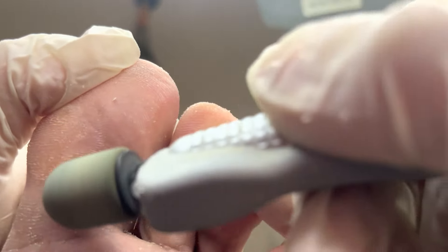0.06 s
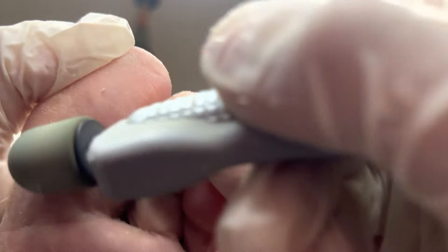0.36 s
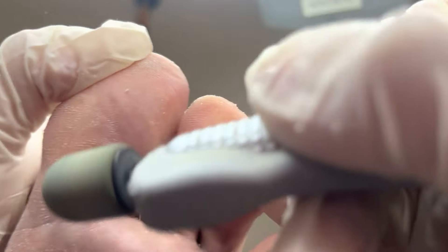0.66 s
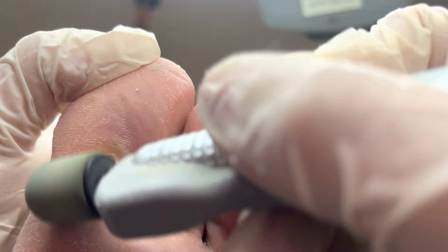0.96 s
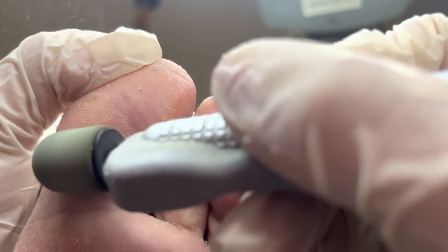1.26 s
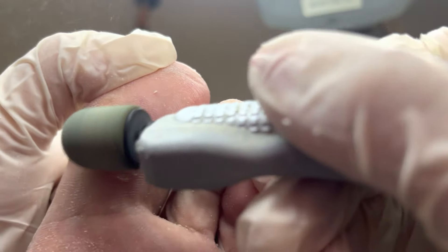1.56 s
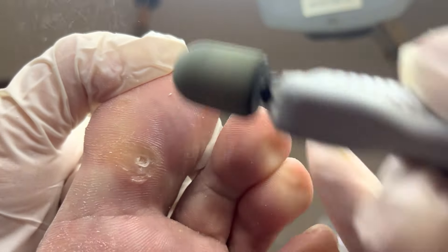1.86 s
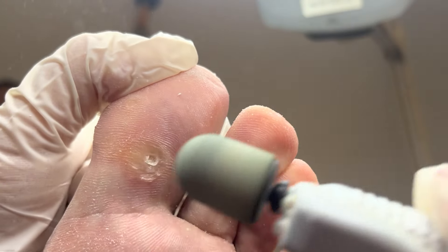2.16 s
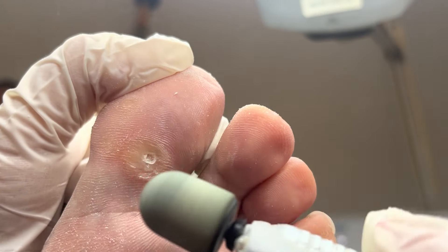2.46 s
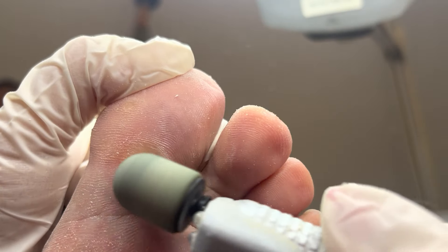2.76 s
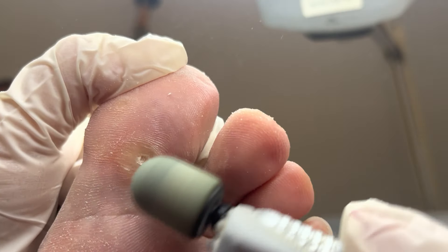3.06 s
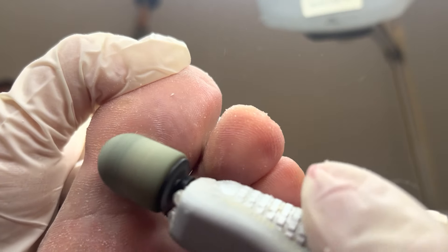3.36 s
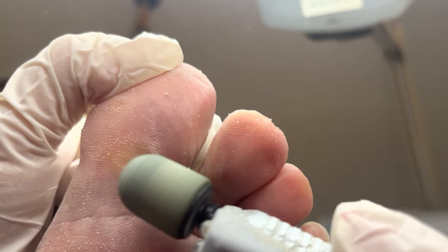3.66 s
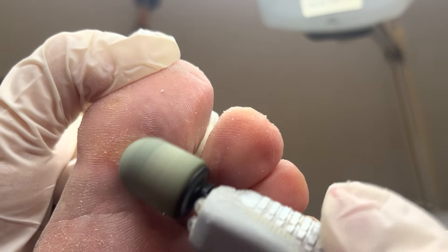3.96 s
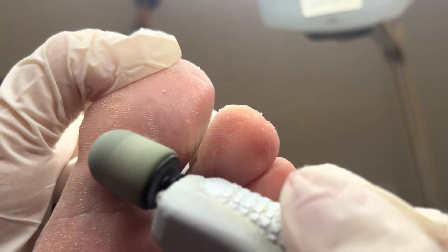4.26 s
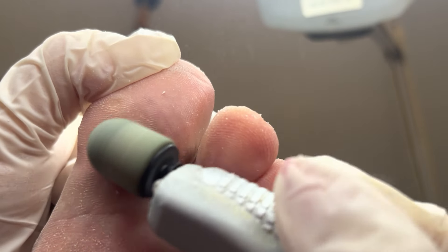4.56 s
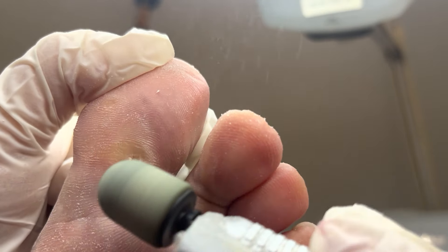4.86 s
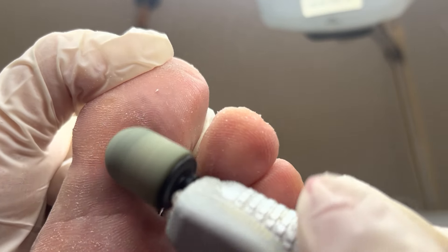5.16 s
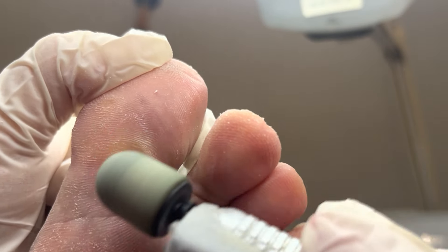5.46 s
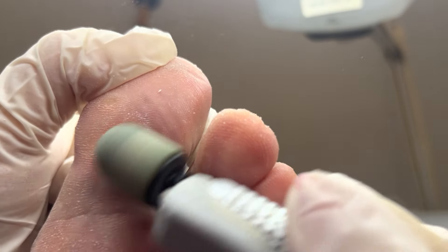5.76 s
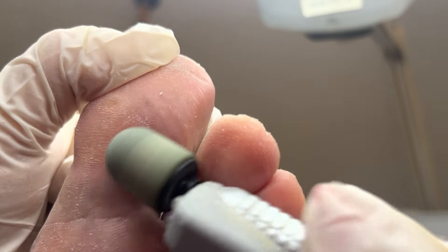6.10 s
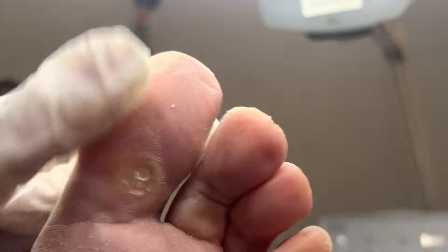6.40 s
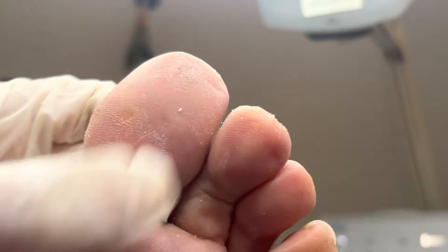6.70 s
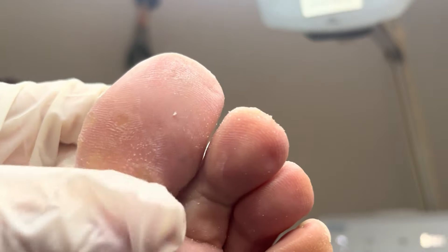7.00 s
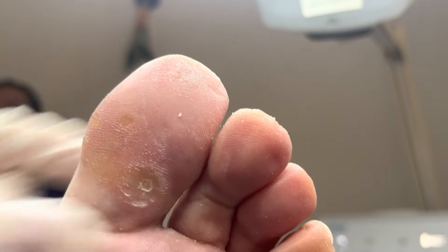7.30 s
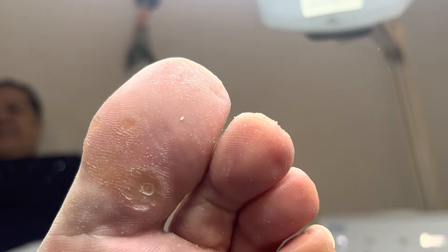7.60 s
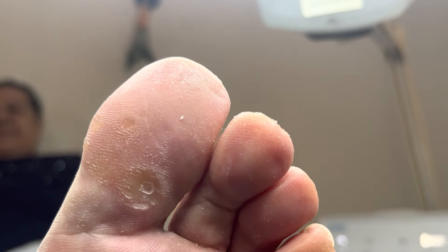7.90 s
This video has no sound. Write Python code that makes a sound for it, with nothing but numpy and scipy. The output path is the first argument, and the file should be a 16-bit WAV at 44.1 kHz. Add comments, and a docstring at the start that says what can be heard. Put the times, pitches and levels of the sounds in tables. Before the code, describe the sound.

In a quiet treatment room, a small electric rotary drill sands a callus close to the microphone. Short, uneven strokes hiss and crackle with a fast rattling buzz and tiny sharp ticks. The sanding pauses briefly while the drill keeps spinning, then resumes for a longer run. The tool is drawn away with a click and whirs on over faint ventilation hum. A soft bump on the microphone comes at the end.

```python
"""Sanding a callus with a rotary drill

In a quiet treatment room a sanding cap is stroked over the skin. Friction makes the grit hiss and
crackle; under pressure the uneven cap knocks several times a turn. The drill is drawn away, bearings
still whirring, over the hum of ventilation. At the end a hand bumps the recorder and its case rings."""
import sys
import numpy as np
from scipy import signal
from scipy.fft import rfft, irfft, next_fast_len
from scipy.io import wavfile
from scipy.ndimage import uniform_filter1d

SR = 44100
rng = np.random.default_rng(int(sys.argv[2]) if len(sys.argv) > 2 else 0)


def unload_wav(signal):
    """Save mono or channel-first audio to the path in sys.argv[1] as 16-bit WAV at rate SR, clipped to [-1, 1]."""
    wavfile.write(
        sys.argv[1],
        SR,
        np.round(np.clip(np.atleast_2d(signal).T, -1, 1) * 32767).astype(np.int16),
    )


N = 350122
TIME = np.arange(N) / SR
PADDED = next_fast_len(N + SR // 2)
BIN_HZ = np.maximum(np.arange(PADDED // 2 + 1) * SR / PADDED, 1)


def from_db(db):
    """Amplitude grows tenfold every 20 dB."""
    return 10 ** (np.asarray(db) / 20)


def unit_rms(x):
    """Dividing by the root mean square gives unit power."""
    return x / np.sqrt(np.mean(x ** 2) + 1e-20)


def in_time(rows):
    """Linear interpolation gives each column of a time curve at every sample."""
    times, *columns = np.transpose(rows)
    return [np.interp(TIME, times, column) for column in columns]


def by_hz(points):
    """Interpolation over log frequency gives a value at every bin."""
    hz, value = np.transpose(points)
    return np.interp(np.log(BIN_HZ), np.log(np.maximum(hz, 1)), value)


def filtered(x, response):
    """A linear filter multiplies the spectrum by its response."""
    return irfft(rfft(x, PADDED) * response, PADDED)[..., :N]


def colour(points):
    """A spectral envelope of unit power gain, rolling off outside its range."""
    skirts = (1 + (.7 * points[0][0] / BIN_HZ) ** 4) * (1 + (BIN_HZ / points[-1][0] / 1.15) ** 12)
    return unit_rms(from_db(by_hz(points)) / np.sqrt(skirts))


def drift(rate_hz):
    """Low-passed noise wanders at random with unit spread."""
    return unit_rms(filtered(rng.standard_normal(N), 1 / (1 + (BIN_HZ / rate_hz) ** 2)))


def decay(x, seconds):
    """Exponential relaxation gives every impulse a tail."""
    return signal.lfilter([1], [1, -np.exp(-1 / (seconds * SR))], x + 1e-18)


def ring(x, hz, seconds):
    """A damped mode answers each impulse with a dying sinusoid."""
    radius, angle = np.exp(-1 / (seconds * SR)), 2 * np.pi * hz / SR
    return signal.lfilter([np.sin(angle)], [1, -2 * radius * np.cos(angle), radius ** 2], x + 1e-18)


def shot_noise(per_s, spread_db):
    """Tiny independent impulses of uneven size merge into a crackling hiss."""
    sizes = from_db(spread_db * np.minimum(rng.exponential(1, N), 4))
    return unit_rms(sizes * rng.choice([-1, 1], N) * (rng.random(N) < per_s / SR))


def diffuse(response):
    """A diffuse noise field is coherent at two microphone ports only at long wavelengths."""
    # Each row: frequency in Hz, correlation between the ports.
    coherence = [(30, .995), (120, .92), (250, .74), (400, .5), (600, -.05), (1000, -.25), (1600, -.1),
                 (4000, 0)]
    alike = by_hz(coherence)
    mid, side = filtered(rng.standard_normal((2, N)), response * np.sqrt([1 + alike, 1 - alike]))
    return unit_rms(np.array([mid + side, mid - side]))


def microphones(x, room_db, t60, positions=6):
    """Direct sound adds to reflections off hand, foot and walls, which change as the tool moves."""
    # Each row: frequency in Hz, phase lead of the left port in radians.
    port_phase = [(340, 0), (950, -3.2), (1980, -4.8), (2670, -6.8), (4820, -7), (5340, -4), (6500, -3.1),
                  (8350, -.3), (9560, .4), (12600, 3.1), (15500, 5.9)]
    # Each row: frequency in Hz, left minus right level in dB.
    port_balance = [(200, -12), (900, -8.5), (1500, -9), (2400, -1.5), (3300, -5.5), (4400, -5.5),
                    (5300, -5), (6100, -5.5), (6750, 0.5), (15000, 0)]
    age = TIME[:SR // 3]
    place = 5 * TIME % positions   # five positions a second
    echoes = 0
    for k in range(positions):
        distance = np.abs((place - k + 1) % positions - 1)
        crossfade = np.cos(np.pi / 2 * np.minimum(distance, 1))
        tail = rng.standard_normal((2, len(age))) * from_db(-60 * age / t60) * (age > .001)
        tail /= np.sqrt(np.sum(tail ** 2, axis=1, keepdims=True))
        echoes = echoes + rfft(x * crossfade, PADDED) * rfft(tail, PADDED)
    wet = from_db(room_db) / np.sqrt(1 + (BIN_HZ / 6500) ** 2)   # treble is reflected less
    sides = np.array([[.5], [-.5]])
    direct = rfft(x, PADDED) * np.exp(1j * sides * np.interp(BIN_HZ, *np.transpose(port_phase)))
    balance = from_db(sides * by_hz(port_balance))
    balance /= np.sqrt(np.mean(balance ** 2, axis=0))
    return irfft(balance * (direct + wet * echoes) / np.sqrt(1 + wet ** 2), PADDED)[:, :N]


def press(start, held, attack_s, release_s):
    """Pressure rises exponentially, holds and relaxes as the hand leans in and eases off."""
    return np.exp(np.minimum(TIME - start, 0) / attack_s - np.maximum(TIME - start - held, 0) / release_s)


def drill_level(idle_knock_share=.19):
    """Incoherent powers add: strokes and idle rattle give a level in dB and the share that is knocking."""
    # Rattle of the free-running handpiece close to the microphone, between strokes.
    # Each row: time in seconds, relative level in dB.
    idle_rattle = [(0, -46), (0.45, -43.5), (0.8, -43.5), (1.88, -42.5), (2.04, -47.5), (2.25, -46),
                   (2.82, -48.5), (3.02, -46), (3.19, -50), (3.7, -49.5), (4.17, -45), (4.78, -43),
                   (4.95, -50), (5.42, -44), (5.57, -49), (5.83, -42.5), (6.3, -48.5), (6.65, -59.5),
                   (6.9, -67.5)]
    # Each row: time of full pressure and hold in seconds, relative level in dB, knocking share 0-1.
    strokes = [(0.11, 0.022, -44, 0.2), (0.219, 0.053, -36, 0.85), (0.37, 0.024, -42, 0.33),
               (0.53, 0.035, -45, 0.1), (0.951, 0.05, -35.5, 0.4), (1.069, 0.086, -36.5, 0.6),
               (1.246, 0.047, -34.5, 0.68), (1.391, 0.072, -39.5, 0.68), (1.52, 0.049, -39.5, 0.51),
               (1.605, 0.135, -36, 0.72), (2.87, 0.1, -45, 0.42), (2.912, 0.033, -37.5, 0.78),
               (3.31, 0.021, -43.5, 0.35), (3.41, 0.082, -35.5, 0.7), (3.54, 0.023, -45.5, .2),
               (3.86, 0.019, -44.5, 0.49), (3.996, 0.076, -37, 0.44), (4.35, 0.044, -37, 0.78),
               (4.449, 0.026, -39, 0.5), (4.624, 0.074, -36.5, 0.48), (5.211, 0.11, -35.5, 0.16),
               (5.63, .02, -48, 0.25), (5.703, 0.047, -35.7, 0.56), (6.009, 0.056, -38.5, 0.38),
               (6.141, 0.021, -46.5, 0.2)]
    idle_power = from_db(in_time(idle_rattle)[0]) ** 2
    hiss, knock = idle_power * (1 - idle_knock_share), idle_power * idle_knock_share
    for start, held, level_db, share in strokes:
        power = from_db(level_db) ** 2
        hiss += power * (1 - share) * press(start, held, attack_s=.048, release_s=.06) ** 2
        knock += power * share * press(start, held, attack_s=.055, release_s=.024) ** 2
    return 10 * np.log10(hiss + knock), np.minimum(knock / (hiss + knock), .72)


def sanding(turns, level_db, knock_share, wobble_db, flicker_db, chatter_db, sing_width_hz):
    """Stick-slip friction of grit on skin hisses; between strokes it gives way to the idle rattle."""
    # Spectra of the tip pressed firmly, the free-running handpiece, and the side of the cap.
    # Each row: frequency in Hz, relative density in dB.
    firm_tip = [(1000, -5), (1500, -11), (2100, -23), (2700, 0.5), (3900, -11), (5300, -2.5), (7300, -1),
                (8500, -1.5), (9400, 0.5), (11600, -1), (14000, 0), (15300, 3)]
    free_running = [(1000, -8), (1500, -35), (2100, -0.5), (3500, 5.5), (4700, 2.5), (5500, -5.5),
                    (7800, 3.5), (8900, -1.5), (10700, 3), (12200, -12.5), (15300, -5.5)]
    broadside = [(900, -16), (1500, -4.5), (2100, 7.5), (3000, 5.5), (3900, 12), (5200, 5), (6300, -23),
                 (8000, 11), (9700, -7.5), (11300, 8), (13300, -35), (15000, -14)]
    # Each row: time in seconds, tilt from on the tip (0) to on the side (1).
    tilt = [(0, 0.44), (1.75, 0.62), (2.1, 0), (2.7, 0.21), (7.94, 0.19)]
    # Rubbing sustains the cap's lowest mode; grip and angle shift it.
    # Each row: time in seconds, frequency in Hz, relative level in dB.
    singing_mode = [(0.22, 4720, -14), (1.0, 4980, -16), (1.7, 4768, -17), (2.9, 4840, -7),
                    (3.45, 4870, -7.5), (4.0, 4970, -18), (4.37, 4840, -7), (4.66, 4700, -7),
                    (5.25, 4890, -9), (5.72, 4890, -14), (6.05, 4770, -12)]
    twice_a_turn = np.cos(4 * np.pi * turns - np.pi)
    swell = unit_rms(from_db(wobble_db * twice_a_turn + flicker_db * np.tanh(2 * drift(280))))
    loudness = swell * from_db(level_db) * np.sqrt(1 - knock_share)
    scratch = shot_noise(per_s=22000, spread_db=2.5) * loudness
    rasp = filtered(scratch, 1 / (1 + (BIN_HZ / 6500) ** 8))
    chatter = unit_rms(from_db(chatter_db * np.tanh(2 * drift(170))))
    scratch += rasp * (chatter - 1)   # only the lower band chatters
    firm = np.clip((level_db + 48) / 8, 0, 1)
    side_on = in_time(tilt)[0]
    upright = 1 - side_on
    blend = [(broadside, side_on), (firm_tip, upright * firm), (free_running, upright * (1 - firm))]
    hiss = sum(filtered(scratch * weight, colour(spectrum)) for spectrum, weight in blend)
    sing_hz, sing_db = in_time(singing_mode)
    phase = 2 * np.pi * np.cumsum(sing_hz) / SR
    narrow_band = drift(sing_width_hz) * np.cos(phase) + drift(sing_width_hz) * np.sin(phase)
    sing_gain = from_db(sing_db - 7 * (1.5 - firm))   # up to 7 dB weaker between strokes
    return hiss + sing_gain * loudness * narrow_band


def knocking(turns, level_db, knock_share, uneven_db, jitter_s, bite_s, thud_db, ping_db):
    """Impacts of the bouncing cap's high spots slap the skin, drag grit and excite the cap's modes."""
    # Each row: place in the turn 0-1, relative strength in dB.
    high_spots = [(0.028, 3), (0.232, 0), (0.432, 1), (0.632, 2.5), (0.832, -4)]
    # Each row: frequency in Hz, relative density in dB.
    scrape_spectrum = [(250, -22), (900, -19), (1500, -17.5), (2200, -6.5), (2750, -4.5), (3900, -4.5),
                       (5000, -0.5), (7400, -2.5), (8700, -1.5), (9700, -11.5), (11400, -2.5), (13300, -8),
                       (15000, -2)]
    # The cap on its shaft. Each row: frequency in Hz, relative drive in dB, decay in seconds.
    cap_modes = [(4800, -11.5, 0.0005), (7860, 0, 0.00025), (8820, -4.5, 0.00025)]
    force = from_db(level_db) * np.sqrt(knock_share)
    landing_chance = np.clip(.8 + .035 * (20 * np.log10(force) + 38), .3, .9)
    hits = np.zeros(N)
    for place, spot_db in high_spots:
        draws = rng.uniform(-1, 1, (480, 3))   # per turn: timing, strength, bounce
        when = np.interp(np.arange(len(draws)) + place, turns, TIME) + jitter_s * draws[:, 0]
        heard = (when > 0) & (when < TIME[-SR // 10])
        at = (when[heard] * SR).astype(int)
        _, strength, bounce = draws[heard].T
        lands = np.abs(bounce) < landing_chance[at]
        tilt_db = drift(5.1)[at]   # each spot's strength wanders as the hand tilts
        hits[at] = lands * from_db(spot_db + tilt_db + uneven_db * strength) / np.sqrt(landing_chance[at])
    bite = unit_rms(decay(decay(hits, bite_s), .00018)) * force
    scrape = filtered(bite * rng.standard_normal(N), colour(scrape_spectrum))
    thud = filtered(bite, 1 / (1 + (220 / BIN_HZ) ** 4) / (1 + (BIN_HZ / 900) ** 2))
    ping = 0
    for hz, mode_db, seconds in cap_modes:   # each mode builds up as the spot grips, then dies
        blows = hits * rng.choice([-1, 1], N) * rng.uniform(.87, 1, N)
        ping = ping + from_db(mode_db) * unit_rms(ring(ring(blows, hz, seconds), hz, .00036))
    ping = unit_rms(ping) * force * np.sqrt(knock_share)
    return scrape + from_db(thud_db) * thud + from_db(ping_db) * ping


def handpiece(turns, wobble_db, waver_db):
    """Bearings rattle in the plastic housing, amplitude-modulated by the shaft and the moving hand."""
    # Each row: frequency in Hz, relative density in dB.
    whirr_spectrum = [(1600, -16), (1900, -5), (2120, 0.5), (2500, 2), (2700, 1.5), (2950, -4.5),
                      (3500, -8), (3850, -6.5), (4400, -13.5), (4800, -9), (5550, -6.5), (5950, -1.5),
                      (6600, -18), (7500, -12), (8600, -20), (9700, -13.5), (11800, -20.5), (15500, -18)]
    # Each row: time in seconds, level in dB.
    whirr_level = [(0, -48), (1.7, -49.5), (2.4, -51), (4, -51), (6.3, -50.5), (6.65, -50), (7.0, -50),
                   (7.4, -50.5), (7.6, -53.5), (7.94, -52.5)]
    rattle = shot_noise(per_s=9000, spread_db=3.5)
    modulation = unit_rms(from_db(wobble_db * np.cos(2 * np.pi * turns) + waver_db * drift(8.8)))
    return from_db(in_time(whirr_level)[0]) * filtered(rattle * modulation, colour(whirr_spectrum))


def ventilation(rush_db, hiss_db, drone_hz, waver_db):
    """Airflow makes broadband noise; narrow bands of low hum and a deep drone swell and sink in it."""
    # Each row: frequency in Hz, relative density in dB.
    rush_spectrum = [(24, -12), (37, -4.5), (52, -6.5), (93, -5.5), (128, -7), (148, -6.5), (159, -17.5),
                     (180, -11.5), (192, -7.5), (250, -6.5), (296, -9), (404, -10), (490, -9), (750, -18),
                     (933, -14.5), (1160, -19.5), (1700, -25)]
    # Each row: frequency in Hz, width in Hz, level in dB before the swell.
    hum_tones = [(189.6, 2.5, -65.5), (199.7, 3.9, -63), (227.4, 4.2, -56.5), (252.7, 4.7, -58.5),
                 (279.8, 5, -62.5), (314, 8.6, -67), (381.4, 4.8, -65), (426, 3.7, -70), (461.1, 3.8, -62),
                 (926, 7.9, -65)]
    # Each row: time in seconds, gain of the hum tones in dB.
    hum_swell = [(0, -0.5), (1.5, -1), (1.8, 1), (2.1, -2.5), (2.5, 1), (2.8, -2), (3.5, 1.5), (3.8, -1),
                 (4.2, 0.5), (4.43, 4), (4.6, -1.5), (4.78, 0.5), (5.25, -0.5), (5.6, -6), (5.85, 2),
                 (6.3, 0), (6.72, 0.5), (6.84, 4), (6.95, -2), (7.94, -2)]
    # Each row: time in seconds, level in dB.
    drone_level = [(0, -66), (0.18, -47), (0.42, -63), (0.68, -53), (0.95, -65), (1.12, -50.5), (1.5, -58),
                   (2.1, -57), (2.46, -63), (2.8, -48), (3.08, -59), (3.38, -53.5), (4.05, -62),
                   (4.36, -52), (4.75, -50), (4.88, -55), (5.03, -48), (5.28, -48.5), (5.58, -67),
                   (5.82, -53), (6.03, -57), (6.65, -49.5), (6.82, -59), (7.06, -59), (7.25, -49.5),
                   (7.43, -66.5), (7.9, -47)]
    rush = from_db(rush_db) * diffuse(colour(rush_spectrum))
    hiss = from_db(hiss_db) * diffuse(colour([(1500, 9.5), (3000, -1), (7000, -6.5), (15500, -76)]))
    density = sum(from_db(db) ** 2 / width / (1 + (2 * (BIN_HZ - hz) / width) ** 2) ** 2
                  for hz, width, db in hum_tones)
    tones = np.sqrt(sum(from_db(db) ** 2 for _, _, db in hum_tones)) * diffuse(np.sqrt(density))
    # The low hum tones are evened out, then slowly swell and sink along a curve.
    envelope = unit_rms(np.sqrt(uniform_filter1d(np.mean(tones ** 2, axis=0), size=SR // 4)))
    tones *= from_db(in_time(hum_swell)[0]) / envelope
    drone = np.sqrt(2) * np.sin(2 * np.pi * np.cumsum(drone_hz + 1.4 * drift(4.5)) / SR)
    drone *= from_db(in_time(drone_level)[0] + waver_db * drift(11))
    return rush + hiss + tones + drone


def catches(decay_s, gain_db):
    """Grit and glove catch in short, hence broadband, impulses, brightened by the cap's resonance."""
    # Each row: time in seconds, relative level in dB.
    ticks = [(0.106, -27), (0.1735, -27), (0.373, -28), (.65, -29), (0.721, -42), (1.017, -22), (1.32, -25),
             (1.356, -22), (1.5695, -27), (1.589, -29), (1.6257, -22), (1.7225, -27), (1.7518, -25),
             (2.742, -32), (3.319, -31), (3.3695, -26), (3.957, -25), (4.0105, -31), (4.102, -32),
             (4.128, -33), (4.323, -29), (4.6241, -27), (5.209, -24), (5.696, -23.5), (5.945, -27),
             (6.024, -26), (6.049, -26), (6.113, -31), (6.146, -37), (6.235, -37)]
    # Each row: frequency in Hz, relative density in dB.
    tick_spectrum = [(1400, -16), (2600, -6), (4700, -2), (6400, -10), (8200, 6), (10000, -5), (15000, -16)]
    impulses = np.zeros(N)
    for start, level_db in ticks:
        impulses[round(start * SR)] = from_db(level_db + gain_db)
    return filtered(decay(impulses, decay_s) * rng.choice([-1, 1], N), colour(tick_spectrum))


def sinking_tone():
    """A soft, distant hum glides down and fades; its phase is the integral of its frequency."""
    # Each row: time in seconds, frequency in Hz, level in dB.
    glide = [(.25, 143.3, -73), (.36, 139, -50.5), (.5, 131, -61), (.62, 124, -51.5), (.76, 114.6, -52),
             (.9, 108, -78)]
    hz, level_db = in_time(glide)
    phase = 2 * np.pi * np.cumsum(hz + 2 * drift(9.5)) / SR
    return np.sqrt(2) * from_db(level_db) * np.sin(phase)


def strike(start, modes):
    """The impulse response of a tapped body is the sum of its damped modes."""
    tap = np.zeros(N)
    tap[round(start * SR)] = 1
    rings = sum(from_db(db) * ring(tap, hz, seconds) for hz, db, seconds in modes)
    return filtered(rings, 1 / np.sqrt(1 + (BIN_HZ / 11500) ** 16))


def handling(click_s, bump_s, case_hz, case_width_hz):
    """Impact and friction: the withdrawn drill clicks, then a hand bumps and rubs the recorder's case."""
    # Each row: start in seconds, level in dB, decay in seconds, upper edge in Hz, case share 0-1.
    rubs = [(6.488, -38, 0.0012, 3500, 0), (6.491, -47, 0.02, 2800, 0.1), (7.831, -39, 0.003, 1900, 0.5),
            (7.835, -46.5, 0.068, 1280, 0.44), (7.887, -36.5, 0.01, 3400, 0.13),
            (7.903, -40.5, 0.08, 2170, 0), (7.925, -36, 0.0053, 200, 0)]
    # Modes of the two bodies. Each row: frequency in Hz, level in dB, decay in seconds.
    handpiece_modes = [(260, -42, .005), (900, -44, 0.001), (2490, -37.5, .0011), (4100, -37, .0011),
                       (10100, -31, 0.0006)]
    case_modes = [(453, -42, 0.0036), (1180, -36.5, 0.0027), (2150, -49, 0.0018)]
    rubbing = np.zeros((2, N))
    case = diffuse(1 / (1 + (2 * (BIN_HZ - case_hz) / case_width_hz) ** 2))
    for start, level_db, decay_s, edge_hz, case_share in rubs:
        fade = np.exp(-np.maximum(TIME - start, 0) / decay_s) * (TIME >= start)
        rub = diffuse(1 / np.sqrt(1 + (BIN_HZ / edge_hz) ** 4))
        rubbing += from_db(level_db) * fade * (np.sqrt(1 - case_share) * rub + np.sqrt(case_share) * case)
    return rubbing + strike(click_s, handpiece_modes) + strike(bump_s, case_modes)


def scene():
    """The sources superpose; one shaft, slowing a little under load, paces hiss, knocks and whirr."""
    level_db, knock_share = drill_level()
    turns_per_s = 53 * (1 - .013 * from_db(level_db + 36) + .022 * drift(6))
    turns = np.cumsum(turns_per_s) / SR
    hiss = from_db(.6) * sanding(turns, level_db, knock_share, wobble_db=2.2, flicker_db=2.4,
                                 chatter_db=2.6, sing_width_hz=350)
    knocks = from_db(1) * knocking(turns, level_db, knock_share, uneven_db=1.5, jitter_s=.0006,
                                   bite_s=.0004, thud_db=-20, ping_db=-1.5)
    skin_limit = from_db(-21.5)
    knocks = skin_limit * np.tanh(knocks / skin_limit)   # soft skin yields to the hardest blows
    ticks = catches(decay_s=.0007, gain_db=-2.5)
    cap = microphones(hiss + knocks + ticks, room_db=-4, t60=.13)
    motor = microphones(handpiece(turns, wobble_db=1.2, waver_db=1), room_db=-8.5, t60=.16)
    room = ventilation(rush_db=-48, hiss_db=-61, drone_hz=68.3, waver_db=.5) + sinking_tone()
    bumps = handling(click_s=6.4876, bump_s=7.8297, case_hz=1200, case_width_hz=300)
    return cap + motor + room + bumps


def record(dry, cutoff_hz=15800):
    """A steep low-pass filter limits the bandwidth."""
    return filtered(dry, 1 / np.sqrt(1 + (BIN_HZ / cutoff_hz) ** 1000))


dry = scene()
out = record(dry)
unload_wav(out)
```